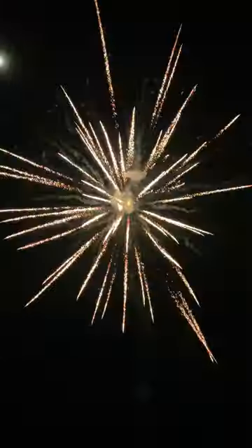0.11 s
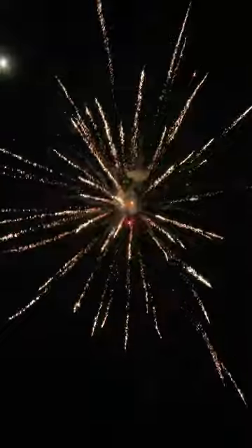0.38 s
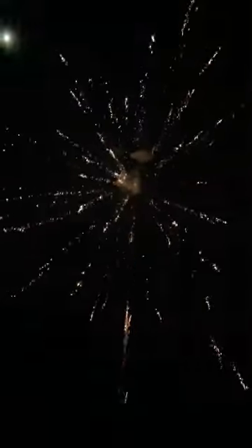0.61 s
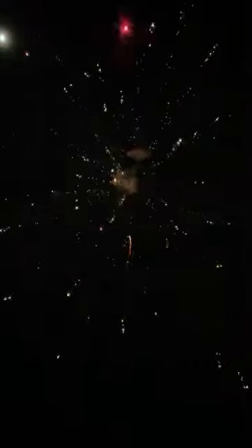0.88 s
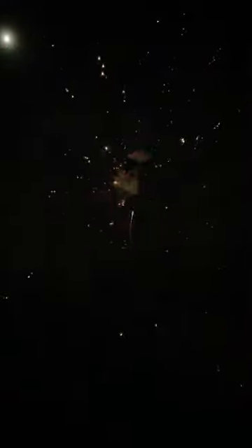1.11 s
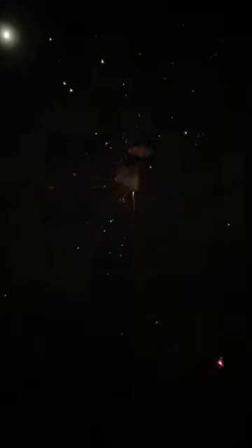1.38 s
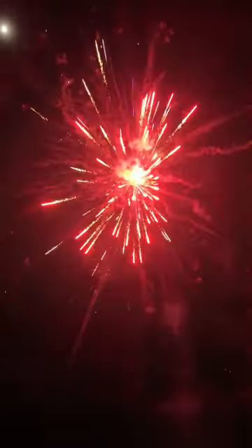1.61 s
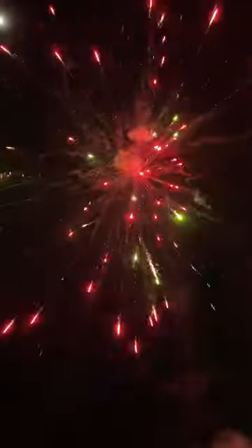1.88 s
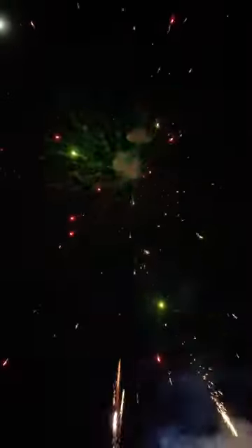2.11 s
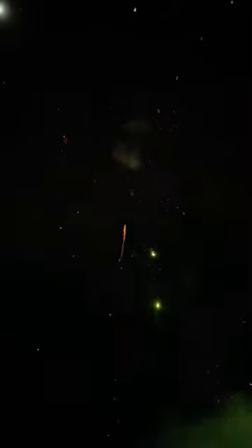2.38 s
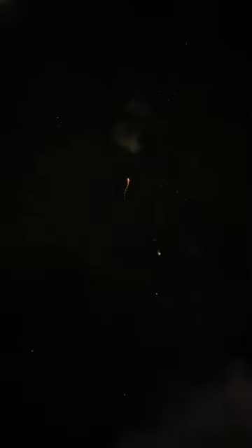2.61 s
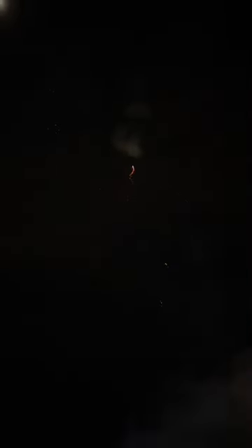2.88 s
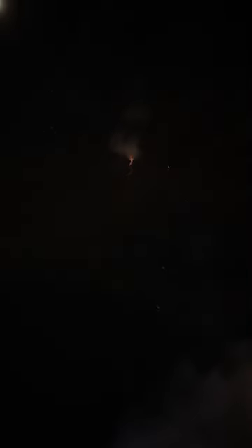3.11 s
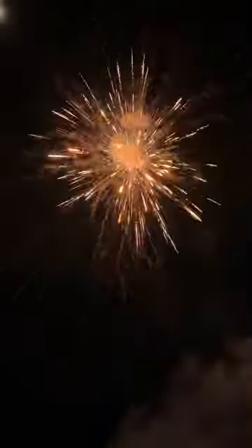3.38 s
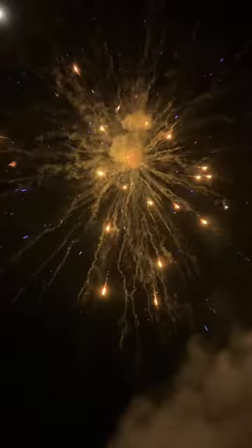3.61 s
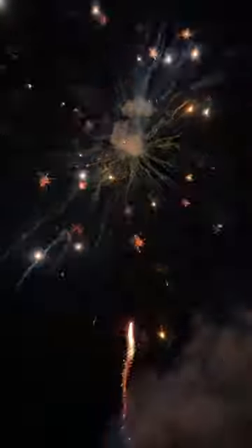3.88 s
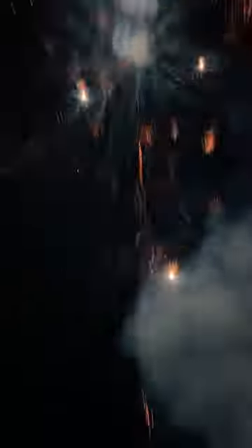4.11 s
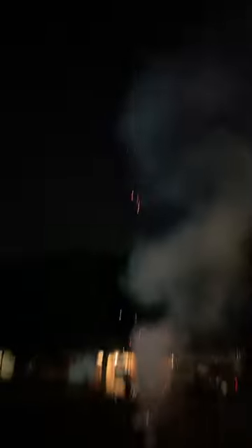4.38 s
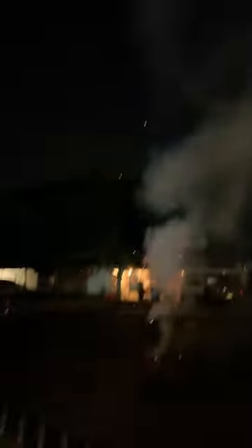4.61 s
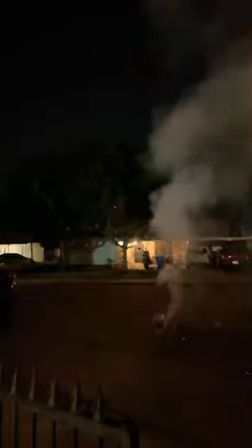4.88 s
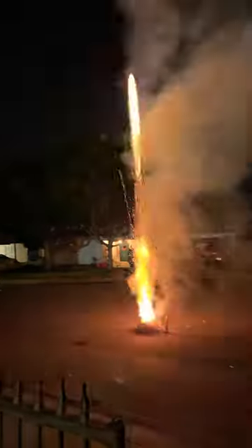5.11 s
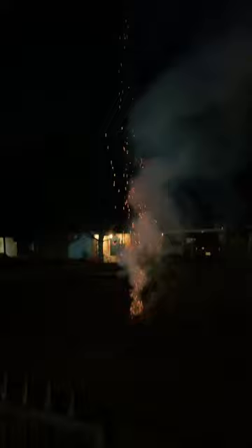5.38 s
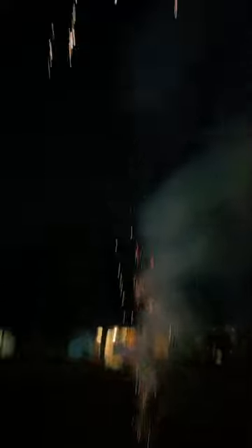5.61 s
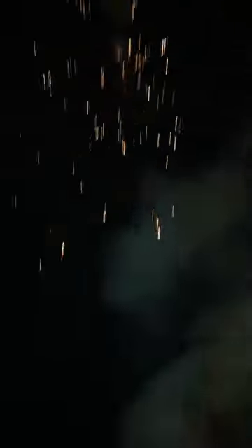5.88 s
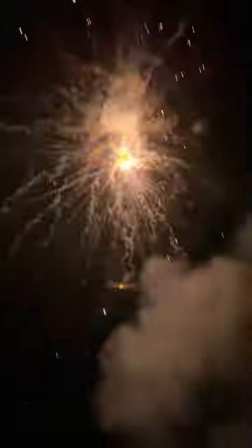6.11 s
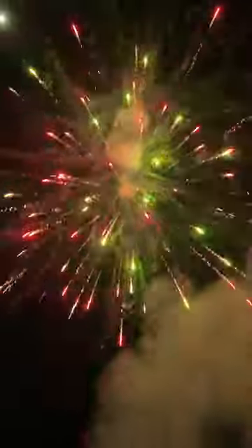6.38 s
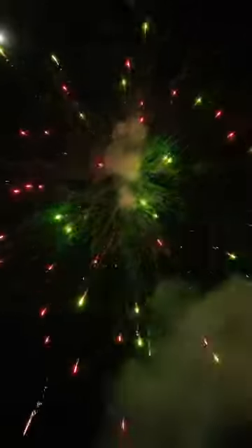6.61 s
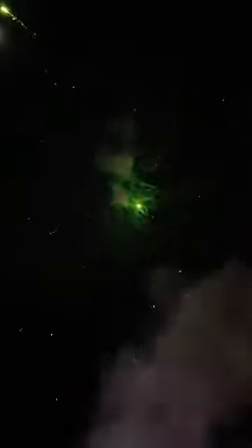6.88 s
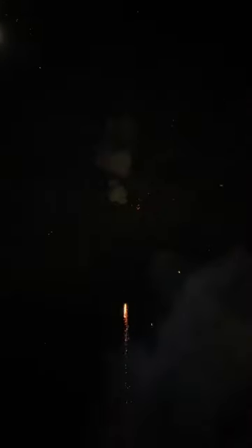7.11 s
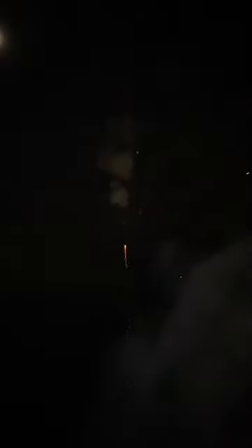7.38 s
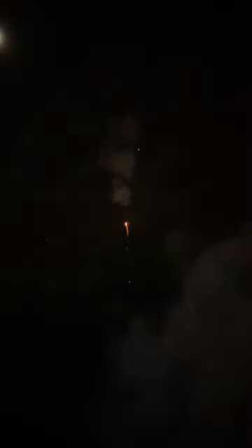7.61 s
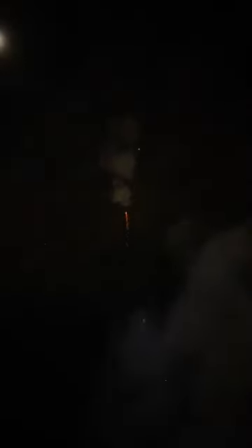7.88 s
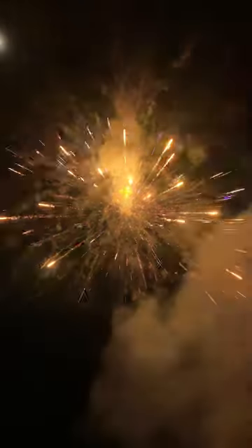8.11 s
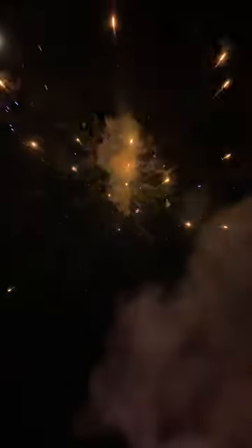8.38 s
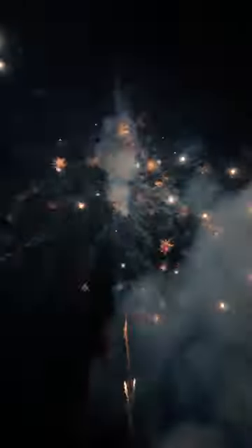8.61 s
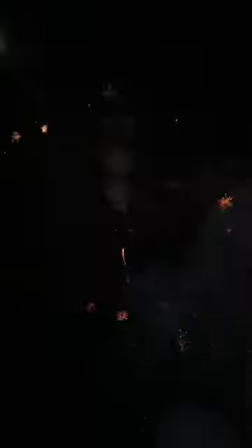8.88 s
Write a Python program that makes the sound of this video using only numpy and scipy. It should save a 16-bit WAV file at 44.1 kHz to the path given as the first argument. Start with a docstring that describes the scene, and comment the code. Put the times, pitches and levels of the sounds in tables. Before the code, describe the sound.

Loud, dry firework bangs outdoors: a thump-crack from the tube, then a sharp burst overhead, repeating. Two launches in the middle are much weaker. Echoes slap off nearby walls and roll away as a darkening hiss. Faint ember ticks, dull distant thuds and low night rumble fill the gaps. Two showers of dense popping crackle follow bursts, the second cut off at the end. Phone sound, squashed at peaks.

```python
"""A multi-shot firework cake in a street at night, heard by a phone. Each lift charge bangs in its tube and each
shell bursts overhead: a sharp shock with a falling ring, then bounces off nearby surfaces. Houses and trees return
a long rolling hiss, made of shaped noise. Two shells shed crackling stars, made of many short pops. Embers tick as
bright puffs of noise over dull far bangs and a low night rumble. The phone's limiter ducks hard at the loudest bangs."""
import sys
import numpy as np
from scipy import signal
from scipy.io import wavfile
from scipy.ndimage import uniform_filter1d, minimum_filter1d

SR = 44100
rng = np.random.default_rng(int(sys.argv[2]) if len(sys.argv) > 2 else 0)


def generate_wav(signal):
    """Clip the signal to [-1, 1] and save it as 16-bit WAV at the path in sys.argv[1]."""
    frames = np.transpose(np.atleast_2d(signal))
    scaled = np.clip(frames, -1, 1) * 32767
    pcm = np.round(scaled).astype(np.int16)
    wavfile.write(sys.argv[1], SR, pcm)


N = 396459
PAD = 4410  # samples of lead-in, cut off at the end

# Lift charges. Each row: start in seconds, crack in dB, crack off the near walls in dB,
# ring off the near walls in dB, street echo in dB.
LIFTS = [(0.4016, 26.5, 0, -9.5, -28.5), (2.0075, 27.5, -5.5, -10, -29.5), (3.7322, -3.5, -6, -2.5, -30.5),
         (5.1200, 2.5, -2.5, -5.5, -32), (6.8915, 24.5, -10, -3.5, -29.5), (8.4077, 24, -11, -8, -27)]
# Shell bursts. Each row: start in seconds, crack in dB, ground bounce in dB, thump in dB, street echo in dB.
BURSTS = [(-.085, 22, -10, -29, -27.5), (1.6452, 25, -8.5, 12, -25), (3.4502, 18.5, -7.5, 0, -25.5),
          (4.832, 21.5, -29.5, -5.5, -24.5), (6.3, 20, -5.5, 2.5, -26.5), (8.1137, 24, -12, 2, -26)]
# How the street answers a lift, and a burst. Each holds: level in dB before the houses answer, their answer in
# seconds, the end of their hold in seconds, their fade in dB per second, far returns in dB, far fade in dB per second.
LIFT_STREET = (2.5, 0.0437, 0.1441, 90, -24, 20.5)
BURST_STREET = (-7.5, 0.04, 0.1113, 47, -11.5, 20.5)
# Colour of a shock. Each row: frequency in Hz, relative level in dB.
FRONT = [(300, -8), (1000, 7.5), (2400, -4), (3900, -7.5), (5500, -3), (8000, -12.5), (12000, -28.5),
         (16000, -36), (22000, -27)]


def gain_of(db):
    """Turns decibels into a factor."""
    return 10 ** (np.asarray(db) / 20)


def evened(x):
    """Scales a sound to rms 1."""
    return x / np.sqrt(np.mean(x ** 2) + 1e-20)


def read(points, hz):
    """Reads a spectrum table at the frequencies hz, along a logarithmic scale."""
    f, value = np.transpose(points)
    return np.interp(np.log(hz + 1), np.log(f + 1), value)


def add(mix, s, sound):
    """Mixes a sound in at s seconds; the mix starts PAD samples early."""
    part = mix[round(s * SR) + PAD:][:len(sound)]
    part += sound[:len(part)]


def filtered(x, hz, kind, order):
    """Passes a sound through a Butterworth filter."""
    return signal.sosfilt(signal.butter(order, hz, kind, fs=SR, output="sos"), x)


def sweep(start_hz, end_hz, glide, t60, size=3000):
    """A pressure kick that rings down from high to low, as a shock does in a small microphone."""
    t = np.arange(size) / SR
    turns = end_hz * t + (start_hz - end_hz) * glide * (1 - np.exp(-t / glide))
    return np.sin(2 * np.pi * turns) * gain_of(-60 * t / t60)


def coloured(colour, size=1024):
    """A causal impulse with the shape of the given spectrum, peak 1."""
    hz = abs(np.fft.fftfreq(size, 1 / SR))
    log_gain = np.log(gain_of(np.maximum(read(colour, hz), -100)))
    phase = -signal.hilbert(log_gain).imag  # puts the energy as early as possible
    taps = np.fft.ifft(np.exp(log_gain + 1j * phase)).real[:size // 2]
    return taps / abs(taps).max()


def lifts():
    """Lift charges: a shock in the tube, a push ahead of it, then scatter and walls close by."""
    out, t = np.zeros(N + PAD), np.arange(3000) / SR
    push = sweep(420, 400, .01, .08, size=420) * np.hanning(420) ** .5
    street_slaps, walls = slaps(LIFT_STREET), yard()
    for s, crack_db, walls_crack_db, walls_ring_db, echo_db in LIFTS:
        add(out, s, shock(crack_db, crack_db - 5, 320, 0.027))
        add(out, s - .0108, gain_of(crack_db - 40.5) * push)
        add(out, s, gain_of(echo_db + 4.0) * street_slaps)
        scatter = evened(signal.oaconvolve(rng.standard_normal(3000), coloured(FRONT))[:3000])
        scatter_db = walls_crack_db - 21.5 - 60 * t / 0.36
        add(out, s + .004, gain_of(scatter_db) * scatter * np.hanning(6000)[3000:])  # fences and shrubs
        for delay, wall_crack_db, wall_ring_db in walls:
            bounce = shock(walls_crack_db + wall_crack_db, walls_ring_db + wall_ring_db, 400, 0.023,
                           glide=1.28, rough=0.7, swing=0.083)
            add(out, s + delay, bounce)
    return out


def bursts():
    """Shell bursts: a shock overhead, its bounces from below, and a slow thump of air."""
    # Ground and fence under a burst. Each row: delay in seconds, crack in dB, ring in dB,
    # both relative to the burst's own and its ground bounce.
    bounces = [(.0017, -1.5, -3.5), (.0055, 8, -12.5), (0.0131, -33.5, -10.5)]
    out, t = np.zeros(N + PAD), np.arange(900) / SR
    street_slaps = slaps(BURST_STREET)
    overpressure = .5 * np.exp(-((t - .006) / 0.0033) ** 2)
    suction = np.exp(-((t - .013) / 0.0022) ** 2)
    for s, crack_db, ground_db, thump_db, echo_db in BURSTS:
        ring_db = crack_db - 1.5
        add(out, s, shock(crack_db, ring_db, 386, 0.017))
        add(out, s, gain_of(echo_db - 3.0) * street_slaps)
        for delay, bounce_crack_db, bounce_ring_db in bounces:
            bounce = shock(crack_db + bounce_crack_db, ring_db + bounce_ring_db, 330, 0.024)
            add(out, s + delay, gain_of(ground_db) * bounce)
        add(out, s + 0.0024, gain_of(thump_db) * (overpressure - suction))
    return out


def shock(crack_db, ring_db, ring_hz, t60, glide=2.84, rough=0.2, swing=0.78):
    """A shock front with a few ms of ragged air, then the ring of the blast, gliding down from glide * ring_hz."""
    t = np.arange(3000) / SR
    ragged = rng.standard_normal(3000) * gain_of(-60 * t / 0.0067)
    jump = np.r_[1, -.8, np.zeros(2998)]
    front = signal.oaconvolve(jump + rough * ragged, coloured(FRONT))[:3000]
    wave = gain_of(crack_db) * (front + swing * sweep(3200, 1000, 0.0002, 0.0066))
    wave += gain_of(ring_db) * sweep(glide * ring_hz, ring_hz, 0.0018, t60)
    return filtered(wave, 70, "highpass", 1)  # little bass in so short a wave


def yard(count=14):
    """Main walls of a lift, and lesser surfaces at chance delays that weaken with delay."""
    # Near walls. Each row: delay in seconds, crack in dB, ring in dB, on top of each lift's own wall levels.
    walls = [(.0011, 3.5, -15), (.0022, -9, -17.5), (.0036, -13, 3), (.018, -13.5, -2), (.042, -9.5, -9),
             (.044, -11.5, -6)]
    place, strength = rng.random((count, 2)).T
    delay = .012 + .11 * (np.arange(count) + place) / count
    loss_db = 170.5 * delay + 4 * strength  # fade in dB per second, plus chance
    return walls + list(zip(delay, -19 - loss_db, -1.5 - loss_db))


def slaps(shape, count=70):
    """Single house fronts and cars: duller copies of the shock at scattered delays, drawn once for all shots."""
    out = np.zeros(PAD + SR)
    for place, strength, pitch in rng.random((count, 3)):
        delay = .045 + .4 * place
        db = returns_db(delay, *shape) - 10 * strength
        slap = shock(-6 - 20 * delay, 0, 250 + 900 * pitch, 0.017, glide=1.5, rough=1.0)
        add(out, delay, gain_of(db) * slap)
    return out[PAD:]


def returns_db(delay, early_db, answer, hold, fade, far_db, far_fade):
    """Strength of the street's returns: near houses hold and fade fast, far ones linger."""
    near_db = np.where(delay < answer, early_db, -fade * np.maximum(delay - hold, 0))
    return 10 * np.log10(gain_of(near_db) ** 2 + gain_of(far_db - far_fade * delay) ** 2)


def stars():
    """Crackling stars: over a thousand tiny pops a second, louder snaps, their scatter and a duller echo."""
    # Each star is a flurry that starts quickly and thins out. Each row: start in seconds, flurry level in dB,
    # seconds to fade by 60 dB, first pop in dB.
    flurries = [(3.9236, -35.5, .4, -14), (3.973, -33, 0.27, -18), (4.001, -27, 0.22, -14),
                (4.054, -26.5, 0.48, -10), (4.0943, -24.5, .8, -9.5), (4.1798, -22, 0.27, -10.5),
                (4.2378, -25.5, .4, -14.5), (4.259, -24.5, 0.38, -15), (4.3058, -29.5, 0.22, -9.5),
                (4.3488, -30.5, 0.2, -12.5), (4.3772, -18.5, 0.1, -4), (4.4098, -30, .1, -9),
                (4.5088, -28, 0.1, -12), (4.5256, -37, 0.09, -15.5), (8.5768, -38, .25, -13.5),
                (8.5876, -47, .1, -17.5), (8.5984, -42, .15, -17), (8.6624, -52, .1, -31),
                (8.713, -27, 0.37, -16.5), (4.5164, -38.5, .1, -15.5), (4.0306, -35, 0.18, -12),
                (8.6456, -35.5, 0.28, -16), (8.6979, -29, 0.99, -10), (8.746, -24.5, 0.78, -12),
                (8.774, -24.5, 0.48, -5.5), (8.83, -27, .5, -14), (8.8561, -21.5, 0.41, -8),
                (8.928, -25, 0.72, -6.5), (8.9511, -29, .8, -7)]
    # Colour of a pop. Each row: frequency in Hz, relative level in dB.
    colour = [(120, -38.5), (200, -4.5), (299, -3), (465, -0.5), (529, -3.5), (1020, 3), (1180, 1),
              (1650, -3.5), (6520, 1), (9500, -8.5), (16000, -29)]
    rise_s, pops_per_s, snaps_per_s, snap_db = 0.0032, 1300, 260, 14
    size = N + PAD
    t = (np.arange(size) - PAD) / SR
    power = np.zeros(size)
    for s, db, t60, _ in flurries:
        power += (np.clip((t - s) / rise_s, 0, 1) * gain_of(db - 60 * abs(t - s) / t60)) ** 2
    level = np.sqrt(power)

    strength = gain_of(3.1 * np.minimum(rng.exponential(1, size), 3.5))
    tiny = strength * (rng.random(size) < pops_per_s / SR)
    pop = coloured(colour)
    tiny = level * evened(tiny) / np.linalg.norm(pop)

    snaps = gain_of(snap_db - 10 * rng.random(size)) * (rng.random(size) < snaps_per_s / SR)
    loud = level * snaps
    for s, *_, first_db in flurries:
        add(loud, s, gain_of([first_db]))

    u = np.arange(SR // 2) / SR
    kind = rng.integers(0, 8, size)  # each tiny pop takes one of eight ragged shapes
    ragged = rng.standard_normal((8, 200)) * gain_of(-60 * u[:200] / 0.0026)
    kicks = loud.copy()
    for k, shape in enumerate(ragged):
        kicks += signal.oaconvolve(tiny * (kind == k), shape / np.linalg.norm(shape))[:size]

    dull = signal.lfilter([1], [1, -.3], rng.standard_normal(len(u)))
    echo = dull * (gain_of(-60 * u / 0.83) + 3 * gain_of(-60 * u / 0.041))
    kicks += gain_of(-10.0) * signal.oaconvolve(kicks, echo / np.linalg.norm(echo))[:size]
    thock = 0.18 * signal.oaconvolve(loud, sweep(2600, 580, 0.00074, 0.019, size=600))  # body of the big pops
    return signal.oaconvolve(kicks, pop)[:size] + thock[:size]


def embers(faint_count=70):
    """Ember ticks: short bright puffs, some set out in a table and fainter ones at chance moments."""
    # The clearest ticks. Each row: start in seconds, level in dB, centre in Hz.
    ticks = list([(0.3354, -49, 4470), (1.0216, -56, 4890), (1.075, -38, 3900), (1.1094, -57, 4060),
                  (1.5194, -60, 6420), (1.5469, -59.5, 5970), (2.794, -55.5, 8500), (2.8235, -62, 8000),
                  (2.8888, -61, 4900), (3.0155, -60, 7500), (3.0969, -62, 7500), (3.3937, -61, 8600),
                  (5.5992, -55, 4040), (5.629, -57, 8860), (5.7604, -60, 9100), (6.1975, -59, 6080),
                  (6.2194, -60.5, 6050), (7.6307, -61.5, 10650), (7.747, -64, 8660)])
    for when, weakness, pitch in rng.random((faint_count, 3)):
        ticks.append((when * N / SR, -64 - 12.5 * weakness, 4200 * 1.6 ** pitch))
    return puffs([(*tick, 0.038) for tick in ticks], 1.6, .0005)


def far_bangs():
    """Far bangs: dull low puffs, smeared by a slower rise."""
    # Each row: start in seconds, level in dB, centre in Hz, seconds to fade by 60 dB.
    thuds = [(1.237, -38, 210, 0.28), (1.255, -53, 297, 0.16), (1.495, -45, 200, 0.17),
             (4.682, -39.5, 152, 0.18), (5.978, -53.5, 376, 0.31), (7.78, -61.5, 357, 0.24)]
    return puffs(thuds, 1.7, .006)


def puffs(rows, width, rise):
    """Bands of noise from hz / width to hz * width that rise in a set time and die away."""
    out, t = np.zeros(N + PAD), np.arange(6000) / SR
    for s, db, hz, t60 in rows:
        band = [hz / width, min(hz * width, 18000)]
        puff = evened(filtered(rng.standard_normal(6000), band, "bandpass", 2))
        add(out, s, gain_of(db - 60 * t / t60) * np.minimum(t / rise, 1) * puff)
    return out


def street():
    """Noise with a spectrum that changes over time: returns of every bang, losing treble, over night rumble."""
    # Colours of the lift echo, the burst echo and the night. Each row: frequency in Hz, relative level in dB.
    lift_colour = [(29, -59.5), (50, -29.5), (203, -8.5), (271, -2.5), (371, -6.5), (439, -4.5), (678, -19),
                   (1210, -12.5), (4900, -21), (16000, -38.5)]
    burst_colour = [(29, -47.5), (50, -21), (198, -4), (408, 0), (765, -9), (1100, -10.5), (2010, -17),
                    (5950, -19.5), (8970, -29), (16000, -46)]
    night = [(24, -42), (40, -17), (91, -5.5), (382, -1), (630, -10.5), (873, -9.5), (1150, -15.5),
             (1630, -18), (6820, -35), (10200, -40.5), (16000, -59.5)]
    # Loss in the air. Each row: frequency in Hz, dB lost per second of travel (a negative loss is a gain).
    air_loss = [(100, -14.5), (400, 5), (1000, 7), (3000, 9), (8000, 12), (16000, 52)]
    # Loudness of the night rumble. Each row: time in seconds, level in dB.
    night_level = [(0, -52), (1.6, -53), (3.1, -55.5), (4.8, -53.5), (6.2, -57.5), (7.8, -59.5), (9, -59)]
    frames, hz = (N + PAD) // 128 + 5, np.fft.rfftfreq(512, 1 / SR)
    t = (np.arange(frames) * 128 - PAD) / SR

    def unit(colour):
        """Power spectrum of a colour, with mean 1."""
        gain = gain_of(read(colour, hz))
        return gain[:, None] ** 2 / np.mean(gain ** 2)

    power = unit(night) * gain_of(np.interp(t, *np.transpose(night_level))) ** 2
    for shots, shape, colour in ((LIFTS, LIFT_STREET, lift_colour), (BURSTS, BURST_STREET, burst_colour)):
        for s, *_, echo_db in shots:
            delay = np.maximum(t - s, 0)
            db = echo_db + returns_db(delay, *shape) - read(air_loss, hz)[:, None] * delay
            window = (t > s + .008) * np.clip(2 - delay, 0, 1)  # faded out from 1 to 2 s
            power += unit(colour) * gain_of(db) ** 2 * window

    a, b, patches = rng.standard_normal((frames, 257, 3)).T
    patches = evened(uniform_filter1d(uniform_filter1d(patches, 20, 0), 6, 1))
    lumps = evened(uniform_filter1d(rng.standard_normal(frames), 2))  # shared by all bands
    white = (a + 1j * b) * gain_of(2.0 * patches + 1.5 * lumps)
    scale = np.std(signal.istft(white, nperseg=512, noverlap=384)[1])
    returns = signal.istft(white * np.sqrt(power), nperseg=512, noverlap=384)[1][:N + PAD] / scale
    return filtered(returns, 60, "highpass", 4)


def scene():
    """Sums all the sounds; the first PAD samples only give the echoes time to begin."""
    mix = lifts() + bursts() + stars() + embers() + far_bangs() + street()
    return mix[None, PAD:]


def band_limit(x):
    """A steep low-pass at the top of the band."""
    return signal.sosfilt(signal.butter(12, 16820, fs=SR, output="sos"), x)


def record(dry):
    """The phone: bass cut, a two-band limiter that ducks, holds and lets go quickly, then soft clipping."""
    heard = filtered(dry[0], 64, "highpass", 2)
    bass = filtered(filtered(heard, 140, "lowpass", 2), 140, "lowpass", 2)
    upper = filtered(filtered(heard, 120, "highpass", 2), 120, "highpass", 2)
    trigger_db = 20 * np.log10(abs(filtered(upper, 750, "highpass", 2)) + 1e-9)
    over_db = 1.339 * np.maximum(trigger_db - 6, 0)  # only far over full scale
    hold = round(0.043 * SR)
    # the highest value nearby is held, from about a millisecond ahead of each peak
    held_db = -minimum_filter1d(-np.r_[np.zeros(hold), over_db], hold + 40, origin=-20)
    held_db = held_db[hold // 2 + 20:][:N]
    fall = np.arange(N) * 3600.0 / SR  # recovery in dB a second
    held_db = np.maximum.accumulate(held_db + fall) - fall
    bass_kept = gain_of(-.8 * uniform_filter1d(held_db, 200))  # the bass ducks less and more smoothly
    ducked = upper / gain_of(uniform_filter1d(held_db, 12)) + bass_kept * bass
    return band_limit(0.96 * np.tanh(ducked / .95)[None])


dry = scene()
out = record(dry)
generate_wav(out)
```